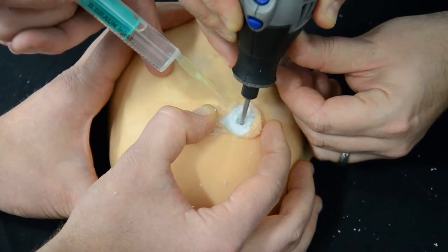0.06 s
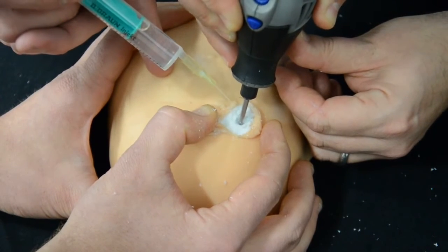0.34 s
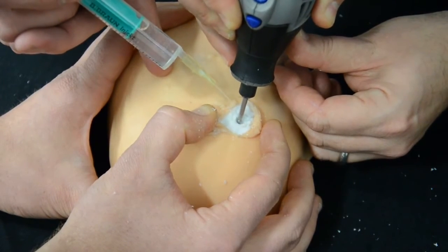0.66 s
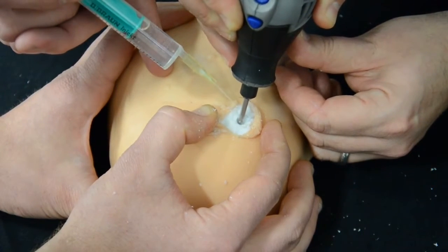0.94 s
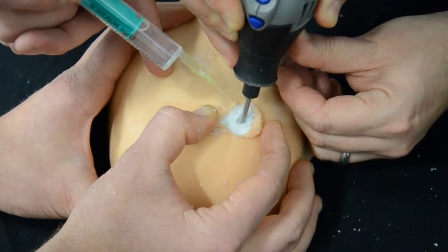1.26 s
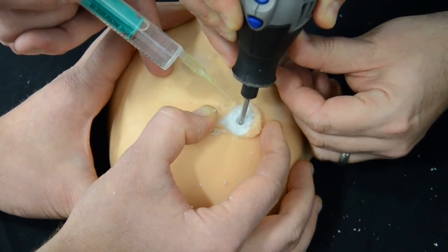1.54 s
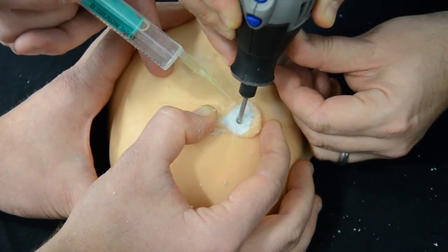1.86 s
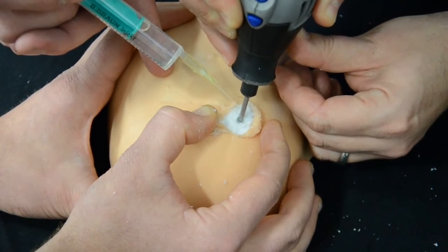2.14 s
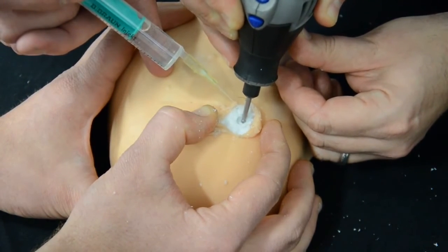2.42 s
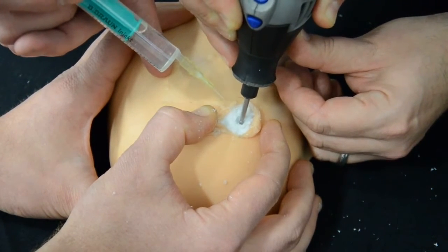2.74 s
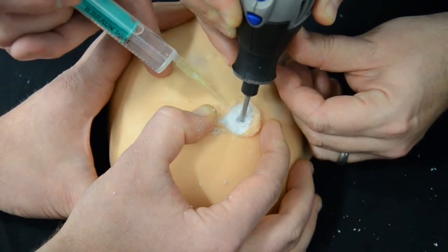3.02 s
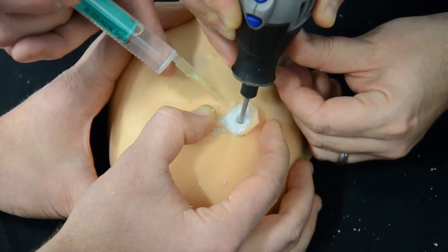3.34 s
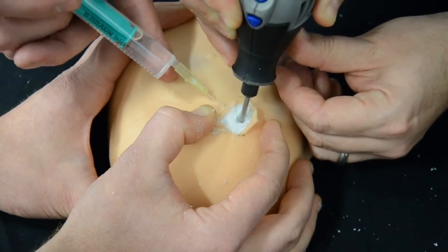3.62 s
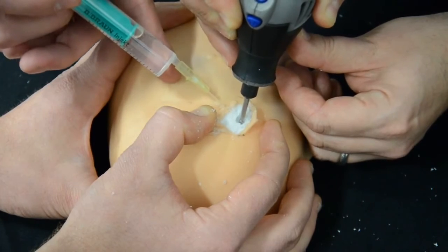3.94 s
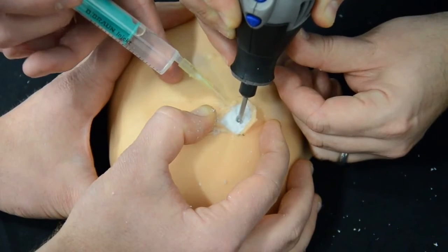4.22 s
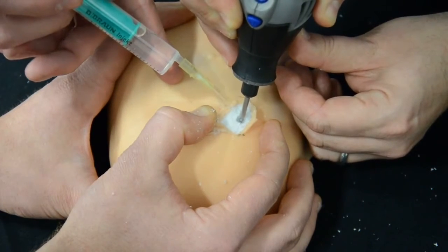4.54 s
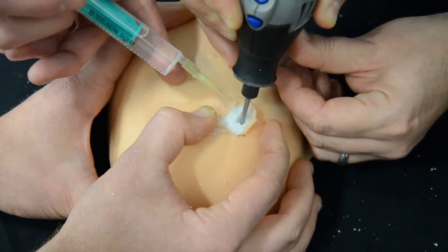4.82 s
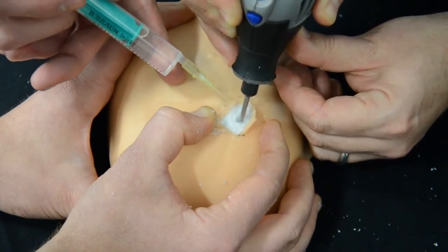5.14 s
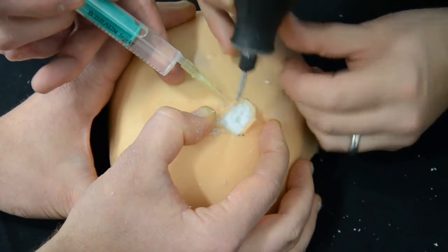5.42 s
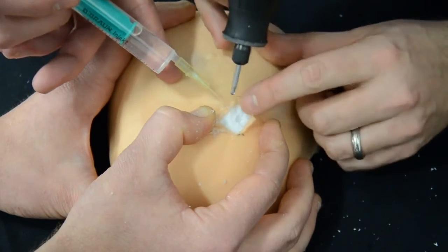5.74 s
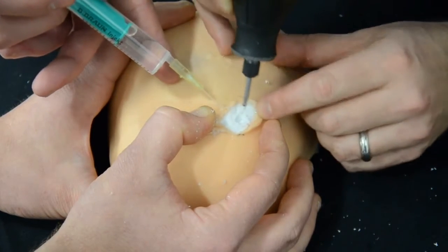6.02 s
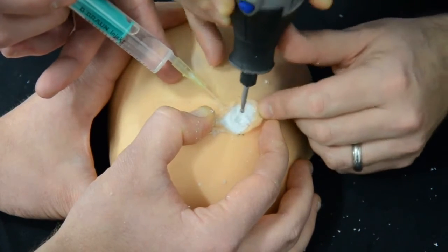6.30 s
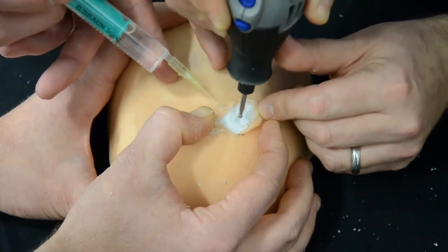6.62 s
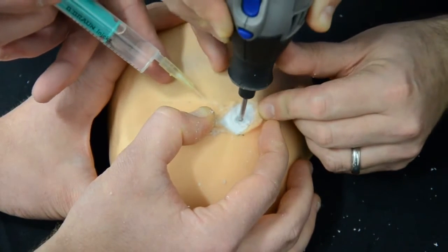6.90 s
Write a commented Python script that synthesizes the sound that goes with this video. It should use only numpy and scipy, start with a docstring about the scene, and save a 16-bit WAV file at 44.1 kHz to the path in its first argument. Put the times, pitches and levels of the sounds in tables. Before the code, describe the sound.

A small rotary tool whines at steady high speed while its burr grinds and chatters in plastic, then runs free.

```python
"""Rotary tool drilling a plastic model

A mains-powered tool runs at about 21,500 rpm while its burr is pressed into a hand-held plastic model.
The motor whines and buzzes with every half wave of the mains, and its fan hisses. The burr knocks once
a turn, rasps, chatters and judders; it is lifted out after five seconds and grazes the rim once more."""
import sys
import numpy as np
from scipy import signal
from scipy.fft import rfft, irfft
from scipy.io import wavfile

SR = 44100
rng = np.random.default_rng(int(sys.argv[2]) if len(sys.argv) > 2 else 0)


def dump_mix(stems):
    """Bounce the given channels to the path in sys.argv[1] as a 16-bit WAV at rate SR."""
    frames = np.atleast_2d(stems).T  # one column per channel
    limited = np.clip(frames, -1, 1)  # hard clip at full scale
    pcm = np.round(limited * 32767).astype(np.int16)
    wavfile.write(sys.argv[1], SR, pcm)


N = 311346
TIME = np.arange(N) / SR
MAINS_HZ, FIRST_SURGE_S = 50.025, .00967


def from_db(db):
    """Decibels to gain."""
    return 10 ** (np.asarray(db) / 20)


def unit_power(x):
    """Scale to an RMS of 1."""
    return x / np.sqrt(np.mean(x ** 2) + 1e-20)


def automation(rows):
    """Draw each column of a timed table as a curve, one value a sample."""
    times, *columns = np.transpose(rows)
    return [np.interp(TIME, times, column) for column in columns]


def drift(rate_hz):
    """Smooth random wander with a spread of 1."""
    hz = np.fft.rfftfreq(N, 1 / SR)
    return unit_power(irfft(rfft(rng.standard_normal(N)) / (1 + (hz / rate_hz) ** 2), N))


def noise(spectrum):
    """Noise shaped by an EQ curve, at unit power."""
    hz, db = np.transpose(spectrum)
    gain = from_db(np.interp(np.log(np.fft.rfftfreq(N, 1 / SR) + 1), np.log(hz), db))
    return unit_power(irfft(rfft(rng.standard_normal(N)) * gain, N))


def high_pass(x, hz):
    """Roll off the lows."""
    return signal.sosfilt(signal.butter(4, hz, "high", fs=SR, output="sos"), x)


def resonate(x, hz, width_hz):
    """One resonance with a peak gain of 1."""
    r = np.exp(-np.pi * width_hz / SR)
    feedback = [1, -2 * r * np.cos(2 * np.pi * hz / SR), r * r]
    return signal.lfilter(np.array([1, 0, -1]) * (1 - r * r) / 2, feedback, x)


def body(force, modes, wander_db, wander_hz):
    """Modes struck through a soft contact, their balance shifting as it moves. Unit power."""
    softened = signal.sosfilt(signal.butter(3, 9000, fs=SR, output="sos"), force)
    return unit_power(sum(
        (-1) ** k * resonate(softened, hz, width) * from_db(db + wander_db * drift(wander_hz))
        for k, (hz, width, db) in enumerate(modes)))


def blows(turns, rough, slip_turns):
    """One sharp blow a turn, uneven in strength and a little early or late."""
    position = turns + slip_turns * drift(150)
    at = np.flatnonzero(np.diff(np.floor(position)) > 0)
    late = (np.ceil(position[at]) - position[at]) / (position[at + 1] - position[at])
    strength = np.exp(rough * rng.standard_normal(N))[at]
    force = np.zeros(N)
    force[at], force[at + 1] = strength * (1 - late), strength * late
    return force


def burst(start_s, length_s, edge_s):
    """A gate with sloping edges."""
    return np.clip(np.minimum(TIME - start_s, start_s + length_s - TIME) / edge_s + .5, 0, 1)


def contacts(rows, edge_s):
    """Gain envelope of a series of contacts, each fading in and out."""
    return sum(from_db(db) * burst(start, length, edge_s) for start, length, db in rows)


def mains_surge(width):
    """The speed control passes one surge of current per half wave (width in half waves)."""
    offset = ((TIME - FIRST_SURGE_S) * 2 * MAINS_HZ + .5) % 1 - .5
    return np.exp(-.5 * (offset / width) ** 2)


def in_hole():
    """1 while the burr is in the plastic, fading to 0 as it is lifted out."""
    return np.clip((5.2 - TIME) / 0.16, 0, 1)


# Hand pressure, one curve for each of five passes into the hole: time_s, level_db
FEED_PASSES = [
    [(0.44, -42.5), (0.53, -32.5), (0.61, -41.5), (0.666, -36), (1.196, -33), (1.258, -29.5), (1.408, -37),
     (1.506, -42), (1.54, -48)],
    [(1.58, -43), (1.602, -42), (2.026, -27), (2.452, -30.5), (2.516, -41), (2.526, -36), (2.63, -38),
     (2.694, -47), (2.72, -43)],
    [(2.76, -44), (2.774, -45), (2.82, -30.5), (2.98, -31), (3.118, -30), (3.18, -33.5), (3.234, -47),
     (3.26, -34), (3.32, -46)],
    [(3.36, -42), (3.426, -31), (3.482, -42), (3.544, -33), (3.706, -38), (3.762, -59), (3.774, -42),
     (3.798, -58), (3.82, -56)],
    [(3.98, -47), (4.048, -35), (4.11, -49), (4.142, -40), (4.37, -28), (4.744, -33), (4.878, -50.5),
     (4.93, -43.5), (5.15, -43)],
]

def feed_db(full_feed_db=-27):
    """How hard the hand feeds the burr, relative to full feed."""
    level_db, = automation(np.concatenate(FEED_PASSES))
    return level_db - full_feed_db


# Fingers shifting on the model: start_s, length_s, level_db
GRIP_SHIFTS = [(.45, 0.22, -54), (1.0, .28, -56), (2.57, 0.23, -52), (3.55, 0.17, -48.5), (5.85, .45, -61)]

def grip():
    """Skin rubbing on the hollow model makes a faint low rumble."""
    rumble = rng.standard_normal(N)
    for _ in range(2):
        rumble = resonate(rumble, hz=200, width_hz=64)
    return contacts(GRIP_SHIFTS, edge_s=0.24) * unit_power(rumble)


# Colour of the vent hiss: frequency_hz, relative_db
AIR_EQ = [(25, -36), (110, -25), (200, -14.5), (450, -14), (760, -6), (1000, -9.5), (1500, 1), (2500, 3.5),
          (3600, 1.5), (5100, 1.5), (6400, 2), (8000, -3), (10200, -7), (12000, -19), (15700, -31)]

def cooling_air():
    """The fan blows a steady hiss through the vents."""
    return from_db(-24.5 + .4 * drift(3)) * noise(AIR_EQ)


def shaft_tone(turns, harmonic):
    """A unit-power sine at a multiple of the shaft speed."""
    return np.sqrt(2) * np.sin(2 * np.pi * harmonic * turns + rng.uniform(0, 2 * np.pi))


# The hum ducks briefly: start_s, length_s, depth_db
HUM_DUCKS = [(.0, 0.16, 11), (0.583, .045, 11), (1.43, 0.13, 10), (2.658, 0.18, 13), (2.99, 0.29, 5.5),
             (3.35, .08, 22), (4.0, 0.072, 17)]

def shaft_hum(turns, unbalance_db=-40, side_load_db=-39.5):
    """The unbalanced shaft hums; side load on the burr adds to it."""
    side_load = in_hole() * from_db(side_load_db + feed_db())
    duck_db = sum(depth * burst(start, length, edge_s=.07) for start, length, depth in HUM_DUCKS)
    waver_db = 1.6 * in_hole() * drift(14)
    return (from_db(unbalance_db) + side_load) * from_db(waver_db - duck_db) * shaft_tone(turns, 1)


# The buzz changes with the angle of the tool: time_s, level_db
BUZZ_LEVELS = [(0, -25), (.5, -26), (3.9, -25.5), (4.5, -28), (5.0, -25.5), (5.9, -27), (6.25, -23.5),
               (7.06, -24.5)]

def armature_buzz(turns, slots=8):
    """The armature slots sing during each surge of current."""
    level_db, = automation(BUZZ_LEVELS)
    flutter_db = (1 + .8 * in_hole()) * drift(45)
    buzz = unit_power(mains_surge(width=0.087) * np.cos(2 * np.pi * slots * turns))
    return from_db(level_db + flutter_db) * buzz


# Fan tones as the tool turns in the hand, before make-up gain: time_s, blade_db, octave_db
FAN_LEVELS = [(0.0, -40, -29.5), (0.49, -34, -31.5), (0.65, -36, -28), (0.73, -33, -33.5),
              (1.38, -36, -34.5), (2.08, -31.5, -34), (2.12, -36, -32.5), (2.87, -34.5, -34),
              (3.03, -35, -38), (3.13, -40, -33), (3.52, -41, -37), (3.6, -34, -48), (3.66, -35, -40),
              (4.07, -39, -44), (4.38, -32.5, -36), (4.56, -28, -46), (4.68, -35.5, -36), (4.86, -37, -45),
              (4.93, -41.5, -38), (5.44, -33.5, -40), (5.5, -33, -27), (5.64, -30, -31),
              (5.92, -30.5, -28.5), (6.09, -30.5, -38), (6.41, -36, -26), (7.0, -36, -30.5),
              (7.06, -33, -35)]
# Faint motor overtones: shaft_harmonic, level_db
MOTOR_OVERTONES = [(2, -51.5), (3, -53), (10, -38.5), (11, -42), (13, -38), (14, -55), (15, -47),
                   (17, -43.5), (20, -46), (21, -45), (22, -43.5), (23, -45.5), (25, -44.5), (26, -63),
                   (27, -45.5), (28, -48), (29, -54), (30, -79), (31, -68), (32, -55)]

def whine(turns, blades=12):
    """The fan blades whine at their passing rate and its octave, over the motor's overtones."""
    blade_db, octave_db = automation(FAN_LEVELS)
    tones = from_db(blade_db + 5.5 + 1.3 * drift(21)) * shaft_tone(turns, blades)
    tones += from_db(octave_db + 2.3 + 1.44 * drift(12)) * shaft_tone(turns, 2 * blades)
    facing_db = 0.078 * (octave_db - np.mean(octave_db))
    for harmonic, level_db in MOTOR_OVERTONES:
        beam_db = facing_db * (harmonic > 2 * blades)   # the top tones beam from the vents together
        tones += from_db(level_db + 2.7 * drift(20) + beam_db) * shaft_tone(turns, harmonic)
    return tones


# Ring of the rim: pitch_hz, width_hz, relative_db
RIM_MODES = [(1800, 150, -4), (2550, 200, -1), (4700, 180, -3), (5060, 180, -2), (5420, 180, 0),
             (6130, 200, 0)]
# The burr glances off the rim: start_s, length_s, level_db
RIM_GRAZES = [(2.063, .08, -37), (2.24, .055, -25), (2.336, 0.042, -23), (2.486, 0.079, -21.5),
              (3.002, 0.022, -28), (3.163, .037, -28), (6.765, 0.035, -19)]

def squeals(turns):
    """Glancing contact with the rim sets the higher modes ringing."""
    force = high_pass(blows(turns, rough=.1, slip_turns=.0018), 1900)
    return body(force, RIM_MODES, wander_db=2, wander_hz=15) * contacts(RIM_GRAZES, edge_s=0.012)


# Ring of the chuck: pitch_hz, width_hz, relative_db
CHUCK_MODES = [(2150, 90, -14), (2505, 90, -5.5), (2870, 80, 0), (3225, 90, -8.5)]

def chuck_rattle(force, wander_db, wander_hz):
    """The chuck rings brightly as the shank strikes it."""
    return body(high_pass(force, 1900), CHUCK_MODES, wander_db, wander_hz)


# Low ring of the hand-held model: pitch_hz, width_hz, relative_db
MODEL_MODES = [(188, 42, -1), (292, 31, 2.5), (586, 290, -1.5), (720, 180, -4), (1065, 160, 2)]
# The burr catches and hops round the hole: start_s, length_s, thud_db, rattle_db
CATCHES = [(0.44, .12, -42, -29), (2.553, 0.068, -36, -28), (2.784, 0.033, -41, -15),
           (3.215, 0.059, -39, -27), (3.595, 0.015, -29, -16), (3.619, 0.094, -34.5, -23.5),
           (3.713, .022, -36, -32), (3.853, 0.032, -34, -29), (4.145, .024, -54, -23),
           (4.25, 0.013, -56, -15), (4.678, .06, -33.5, -25), (4.758, .03, -39, -25)]

def judders(hop_hz=260):
    """The caught burr hops unevenly, thudding into the model and rattling the chuck."""
    hop_count = np.cumsum(hop_hz * from_db(2.5 * drift(60))) / SR
    hops = blows(hop_count, rough=.2, slip_turns=.02)
    thud = body(high_pass(hops, 140), MODEL_MODES, wander_db=2.5, wander_hz=22)
    rattle = chuck_rattle(hops, wander_db=1.5, wander_hz=15)
    return sum(
        burst(start, length, edge_s=0.023) * (from_db(thud_db) * thud + from_db(rattle_db) * rattle)
        for start, length, thud_db, rattle_db in CATCHES)


# Colour of the grinding: frequency_hz, relative_db
RASP_EQ = [(300, -31), (1000, -13.5), (2400, 5.5), (4000, 0.5), (6300, 0), (8000, -5.5), (10000, -20.5),
           (12000, -35), (15700, -34)]
# A larger chip tears off: start_s, length_s, level_db
CHIP_TEARS = [(1.225, 0.045, -21.5), (1.94, 0.12, -25), (2.24, .06, -30), (4.30, .06, -21),
              (4.71, .025, -17)]

def rasp(turns):
    """The burr scrapes off a chip each turn: pulsing noise that swells with the feed."""
    scrape = in_hole() * from_db(-23.5 + 0.36 * feed_db())
    gain = np.hypot(contacts(CHIP_TEARS, edge_s=.03), scrape)
    grain_db = 0.95 * np.cos(2 * np.pi * (turns - .1)) + 3 * drift(71)
    return gain * noise(RASP_EQ) * unit_power(from_db(grain_db))


# Midrange ring of the plastic: pitch_hz, width_hz, relative_db
PLASTIC_MODES = [(700, 100, 0), (1070, 260, -2), (1370, 240, -10)]

def plastic_drone(turns, torque):
    """The burr shoves the plastic once a turn, louder the harder it is fed."""
    shoves = blows(turns, rough=.06, slip_turns=.002) * torque
    drone = body(high_pass(shoves, 474), PLASTIC_MODES, wander_db=2, wander_hz=5.7)
    return in_hole() * from_db(-25 + feed_db()) * drone


# Ring of the burr's knock and of the steel shank: pitch_hz, width_hz, relative_db
BURR_MODES = [(1420, 300, -7.5), (1792, 80, 3.5), (2150, 120, -.5), (2490, 140, -10)]
SHANK_MODES = [(3470, 160, -26), (3790, 110, 1), (4770, 190, -6), (4980, 200, -6), (5380, 69, 3),
               (5540, 140, -4), (6350, 310, -3.5), (7470, 180, -3.5), (7930, 300, -4), (9480, 250, -2)]
# The burr bites the wall; the shank chatters in the chuck: start_s, length_s, level_db
WALL_BITES = [(.495, 0.051, -26.5), (.64, 0.036, -29), (1.21, 0.077, -27), (1.40, 0.046, -23),
              (1.79, 0.049, -25.5), (1.965, .105, -22), (2.26, 0.19, -23), (2.69, 0.064, -28),
              (2.805, 0.073, -22.5), (2.97, 0.059, -21), (3.04, 0.13, -19), (3.39, 0.041, -28),
              (4.135, 0.047, -24.5), (4.31, .12, -23), (4.43, 0.16, -20), (4.60, 0.044, -24.5),
              (4.97, 0.12, -31.5), (6.765, 0.033, -26)]
CHUCK_CHATTERS = [(.26, 0.064, -26.5), (.495, 0.049, -22), (.63, 0.078, -22), (.82, 0.032, -32),
                  (.91, 0.036, -31), (1.10, 0.02, -18.5), (1.19, 0.11, -22), (1.405, 0.041, -18),
                  (1.60, 0.08, -24.5), (1.855, .145, -18.5), (2.045, 0.07, -13), (2.125, .045, -12.5),
                  (2.17, 0.13, -19.5), (2.33, .14, -18.5), (2.857, 0.028, -14), (2.975, 0.046, -25),
                  (3.13, 0.074, -21.5), (3.26, 0.034, -25), (3.548, 0.013, -18.5), (3.61, .025, -17.5),
                  (4.258, 0.02, -14), (4.33, 0.018, -22), (4.385, 0.02, -14), (4.45, 0.17, -23.5),
                  (4.64, 0.041, -18)]

def knock_and_chatter(turns, torque):
    """Each turn the burr knocks on the wall, then the shank hits the chuck; both ring the shank."""
    light_knock = in_hole() * from_db(-33.5 + 0.22 * feed_db() + 2 * drift(25))
    light_rattle = in_hole() * from_db(-30.5 + 0.25 * feed_db() + 2 * drift(41))
    knock_gain = np.hypot(contacts(WALL_BITES, edge_s=.035), light_knock)
    rattle_gain = np.hypot(contacts(CHUCK_CHATTERS, edge_s=.022), light_rattle)
    ring_gain = np.hypot(from_db(-8) * knock_gain, from_db(-12) * rattle_gain)
    wall_hits = blows(turns, rough=.06, slip_turns=.0015)
    chuck_hits = blows(turns + 3 / 8, rough=.055, slip_turns=.0015)
    knock = body(high_pass(wall_hits, 1270), BURR_MODES, wander_db=1.3, wander_hz=8)
    rattle = chuck_rattle(chuck_hits * torque ** .5, wander_db=1.1, wander_hz=9)
    ring = body(high_pass(wall_hits * torque ** 2, 4370), SHANK_MODES, wander_db=4, wander_hz=12)
    return knock_gain * knock + rattle_gain * rattle + ring_gain * ring


# Dips in the microphone's response: centre_hz, width_hz, depth_fraction (capped at max_depth)
MIC_DIPS = [(1952, 280, 0.8), (3667, 380, 0.57), (4480, 290, 0.54), (5730, 550, 1), (6890, 330, 1),
            (7280, 250, 0.16), (15000, 600, .75)]

def mic_colour(sound, max_depth=.8):
    """Narrow dips in the microphone's response colour the whole mix."""
    for hz, width, depth in MIC_DIPS:
        sound = sound - min(depth, max_depth) * resonate(sound, hz, width)
    return sound


# Spindle speed, sagging under load: time_s, speed_hz
SPINDLE_SPEED = [(0, 359.1), (.25, 359), (.44, 357.7), (.62, 358.3), (.8, 357.7), (1.33, 357.2),
                 (1.57, 359.4), (2.05, 357.6), (2.35, 358.8), (2.52, 358.2), (2.7, 359.2), (3.33, 360.7),
                 (3.66, 359.5), (4.1, 360.2), (4.45, 357.7), (4.96, 360.6), (6.39, 363.2), (6.7, 362.4),
                 (7.06, 362.3)]

def scene():
    """One spindle drives the motor and the burr, heard close up in mono."""
    speed_hz, = automation(SPINDLE_SPEED)
    # each surge of current nudges the speed and makes the burr bite harder
    ripple_hz = .6 * np.sin(2 * np.pi * 2 * MAINS_HZ * (TIME - FIRST_SURGE_S))
    torque = unit_power(from_db(4.7 * mains_surge(width=0.21)))
    turns = np.cumsum(speed_hz + ripple_hz + 0.16 * drift(25)) / SR
    motor = shaft_hum(turns) + armature_buzz(turns) + whine(turns) + cooling_air()
    drilling = rasp(turns) + plastic_drone(turns, torque) + knock_and_chatter(turns, torque)
    mix = mic_colour(grip() + motor + squeals(turns) + judders() + drilling)
    return np.array([mix, mix])


def record(dry):
    """A steep low-pass cuts the very top."""
    cutoff_hz = 15750
    return signal.sosfilt(signal.ellip(14, .1, 90, cutoff_hz, fs=SR, output="sos"), dry)


dry = scene()
out = record(dry)
dump_mix(out)
```